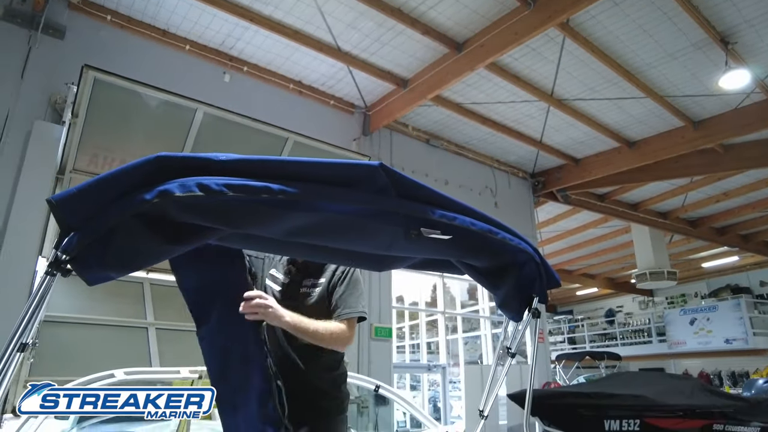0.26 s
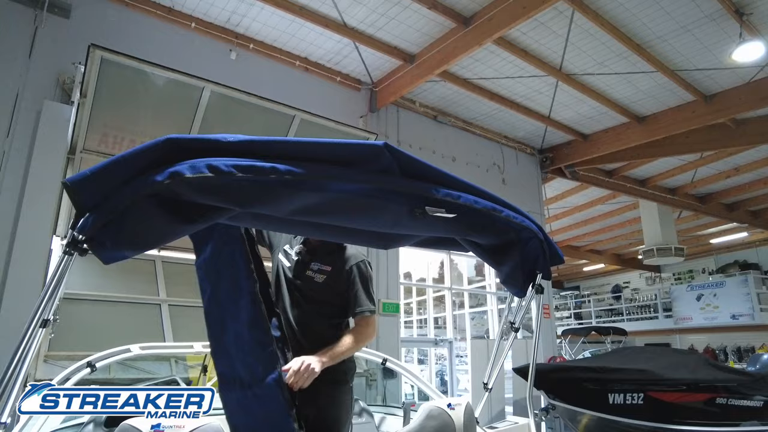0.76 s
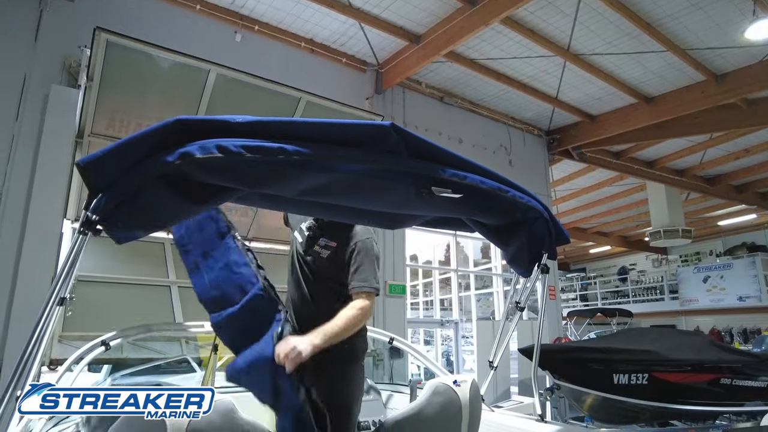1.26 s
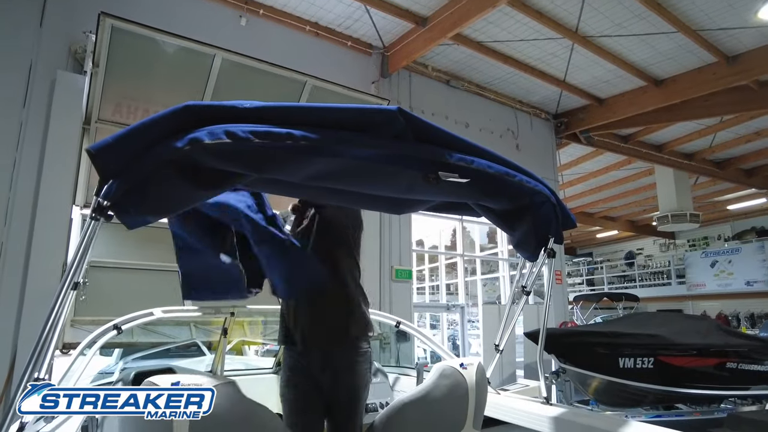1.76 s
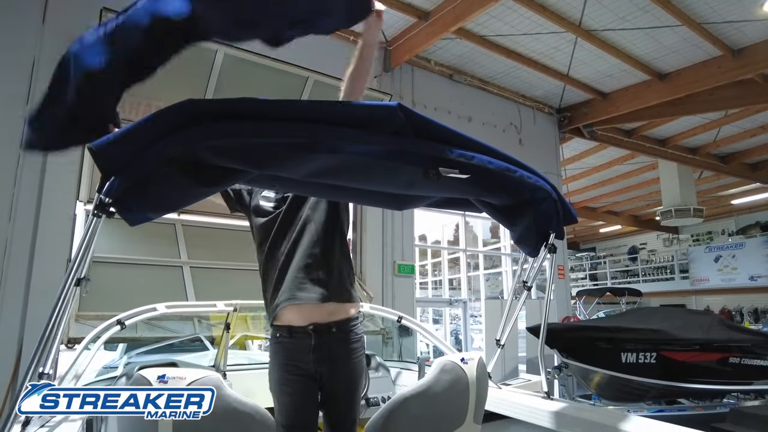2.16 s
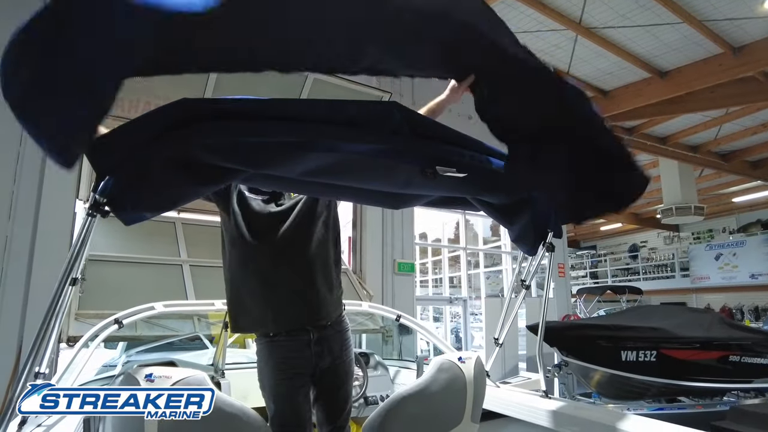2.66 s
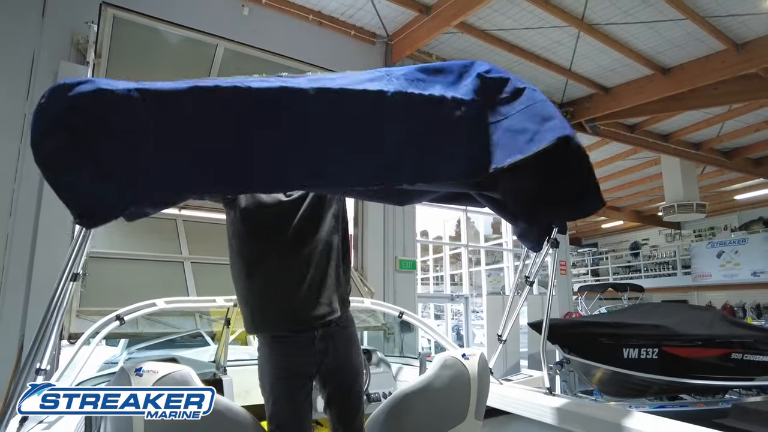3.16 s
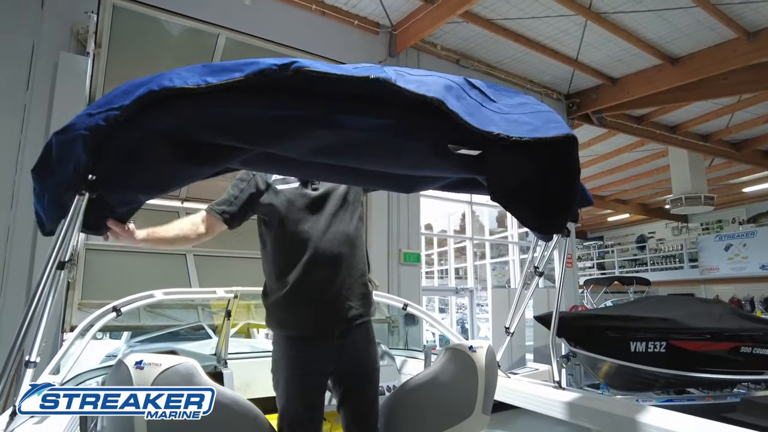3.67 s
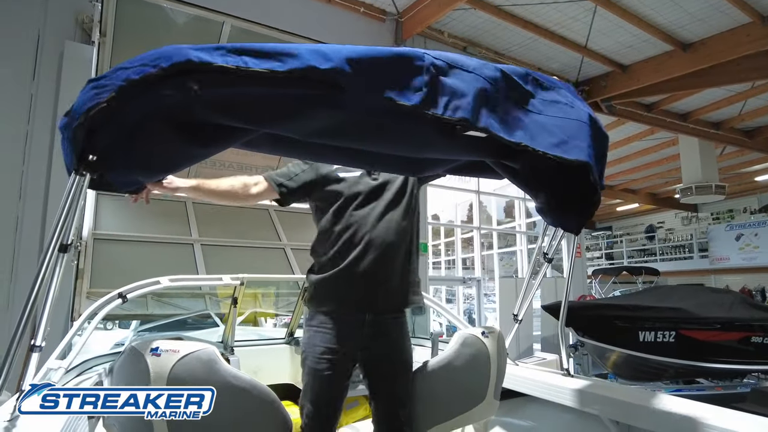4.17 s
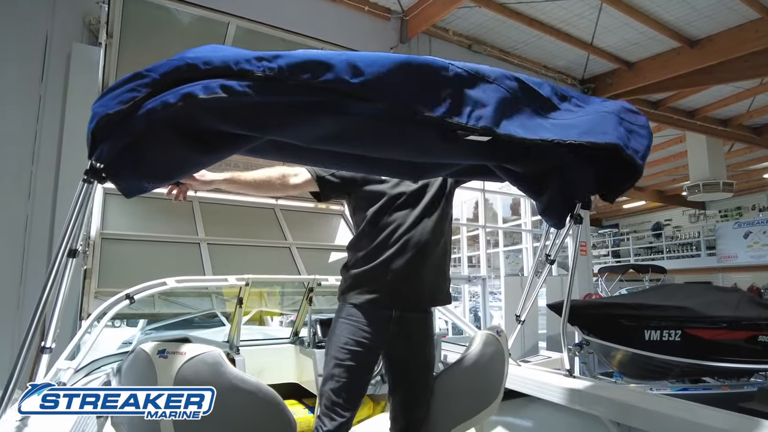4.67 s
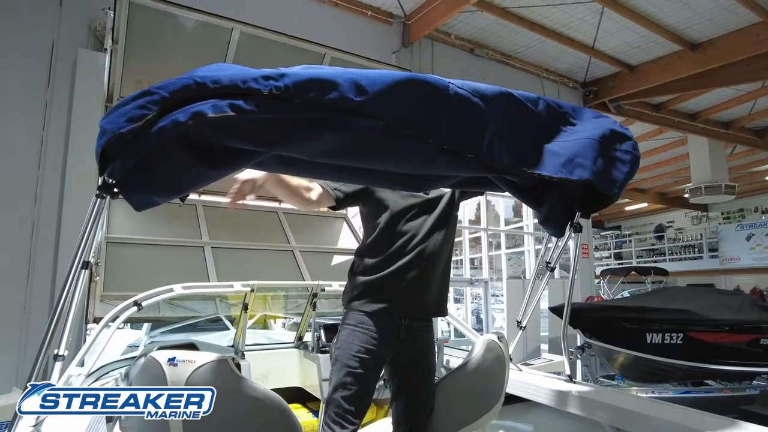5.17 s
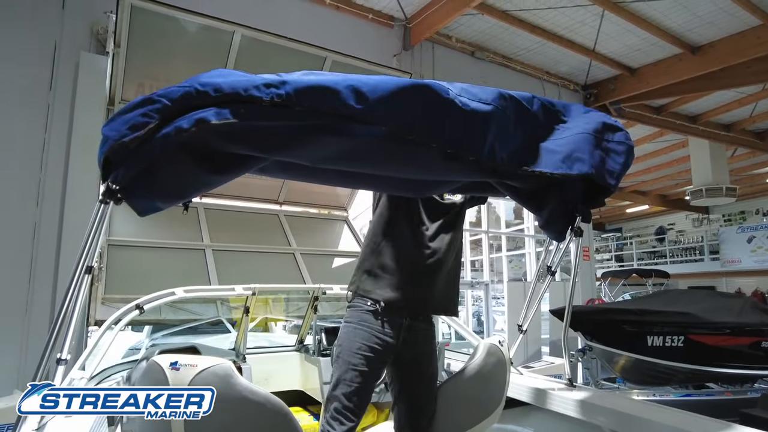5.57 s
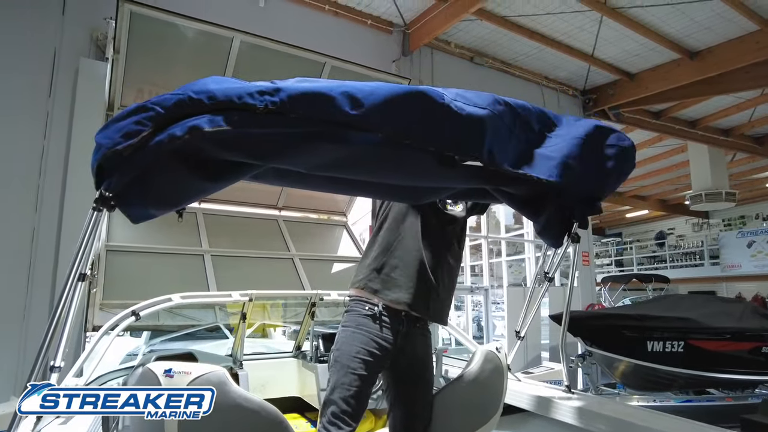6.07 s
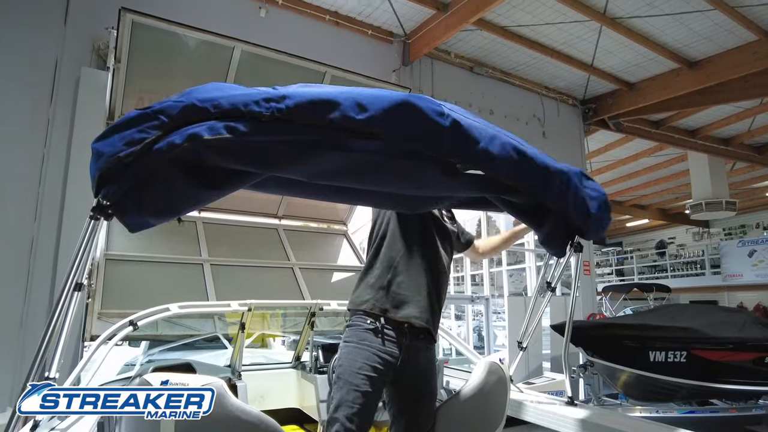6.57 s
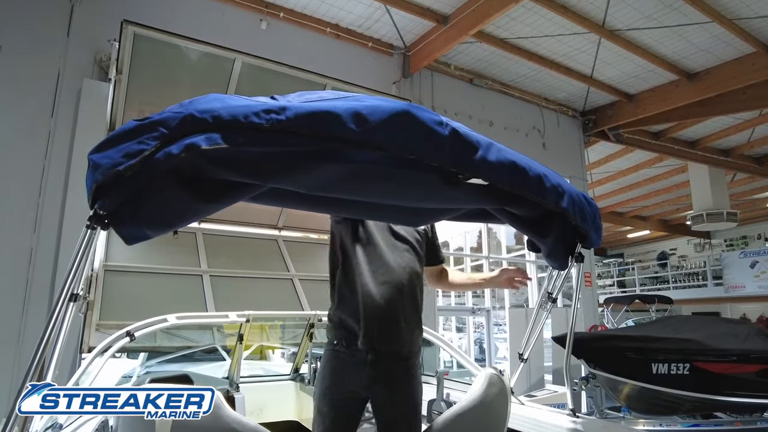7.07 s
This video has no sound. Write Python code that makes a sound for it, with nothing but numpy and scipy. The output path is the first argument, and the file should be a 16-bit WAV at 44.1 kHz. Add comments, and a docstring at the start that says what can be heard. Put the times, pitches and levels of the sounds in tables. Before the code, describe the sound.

Close, thick cloth crumples, flaps and rasps in bursts, with small metal clicks and a few tiny squeaks near the end, inside a big hall.

```python
"""A heavy canvas cover is lifted, thrown over a folded boat top and tugged into place, close to the microphone.
Place: a large showroom, with a steady background and a faint diffuse tail behind the close sounds.
Shaped bursts of tiny random slips make the weave hiss, the seams rasp, the sheet crumple and taut panels sound.
Folds snap in two decaying modes, hem catches are bright noise bursts, and a metal fitting cracks and rings.
The sheet pushes low, filtered puffs of air; near the end the hem gives short gliding squeaks."""
import sys
import numpy as np
from scipy import signal
from scipy.fft import rfft, irfft, next_fast_len
from scipy.io import wavfile
from scipy.ndimage import map_coordinates

SR = 44100
rng = np.random.default_rng(int(sys.argv[2]) if len(sys.argv) > 2 else 0)


def log_audio(samples):
    """Write samples as a 16-bit WAV file to the path given in sys.argv[1]."""
    # one column per channel
    frames = np.atleast_2d(samples).T
    # limit to full scale, then quantise
    limited = np.clip(frames, -1, 1)
    pcm = np.round(limited * 32767).astype(np.int16)
    wavfile.write(sys.argv[1], SR, pcm)


N = 322371  # length [samples]


def from_db(db):
    """Decibels to amplitude gain."""
    return 10 ** (np.asarray(db) / 20)


def rms_one(x):
    """Scale to an rms of 1."""
    return x / np.sqrt(np.mean(x ** 2) + 1e-20)


def in_time(rows):
    """Interpolate each column of a curve, sample by sample."""
    times, *columns = np.transpose(rows)
    return [np.interp(np.arange(N) / SR, times, column) for column in columns]


def add(out, s, sound):
    """Mix a short sound in at time s."""
    at = int(np.clip(round(s * SR), 0, N - 1))
    out[at:at + len(sound)] += sound[:N - at]


def drift(rate):
    """Smooth random wandering with a spread of 1; a higher rate [Hz] wanders faster."""
    step = 40  # samples between the slow values
    pole = np.exp(-2 * np.pi * rate * step / SR)
    noise = rng.standard_normal(N // step + 2002)
    slow = signal.lfilter([1], [1, -2 * pole, pole * pole], noise)[2000:]  # drop the settling
    return np.interp(np.arange(N) / step, np.arange(len(slow)), rms_one(slow))


def colour(x, spectrum):
    """Minimum-phase filter with the given spectrum, falling away beyond both of its ends."""
    size = next_fast_len(N + SR // 2)
    size += size % 2
    hz, db = np.transpose(spectrum)
    octave = np.log2(np.maximum(np.arange(size // 2 + 1) * SR / size, 1))
    above = np.maximum(octave - np.log2(hz[-1]), 0)
    below = np.clip(np.log2(hz[0]) - octave, 0, 2)
    shape_db = np.interp(octave, np.log2(hz), db) - 18 * (above + below)  # 18 dB per octave
    # folding the cepstrum onto positive time makes the filter causal
    cepstrum = irfft(np.log(from_db(shape_db)))[:size // 2]
    cepstrum[1:] *= 2
    response = np.exp(rfft(cepstrum, size))
    return irfft(rfft(x, size) * response)[:N]


def resonate(x, hz, width_hz):
    """A two-pole resonance with gain 1 on top."""
    r = np.exp(-np.pi * width_hz / SR)
    top = np.array([1, 0, -1]) * (1 - r * r) / 2
    return signal.lfilter(top, [1, -2 * r * np.cos(2 * np.pi * hz / SR), r * r], x + 1e-18)


def grains(per_s, spread_db):
    """Random tiny slips of uneven size and either sign; rms 1 at any rate."""
    sizes = from_db(spread_db * np.minimum(rng.exponential(1, N), 4)) * rng.choice([-1, 1], N)
    happens = rng.random(N) < per_s / SR
    return rms_one(sizes * happens / np.sqrt(per_s))


def rub(level_db, spectrum, per_s, spread_db, judder_db):
    """Threads catch and slip; a harder pull makes more slips, and the grip judders."""
    pull = from_db((level_db - np.max(level_db)) / 2)
    slips = grains(per_s * pull, spread_db) * from_db(judder_db * drift(25.0))
    return from_db(level_db) * rms_one(colour(slips, spectrum))


SWELL_DB, SWELL_CURVE = 12, 1.61  # drop one rise before and one fall after the peak; 2 = bell shape


def swell(s, rise_s, fall_s):
    """Gain of one movement: it gathers speed up to time s, then slows."""
    t = np.arange(N) / SR - s
    away = np.maximum(-t / max(rise_s, .001), t / max(fall_s, .001))
    gain, near = np.zeros(N), away < 10
    gain[near] = from_db(-SWELL_DB * away[near] ** SWELL_CURVE)
    return gain


# The held cover keeps stirring, except in flight before it lands; levels before pauses and layer gains:
# (time [s], hiss [dB], crumple [dB])
STIRRING = [(0, -60.5, -60.5), (0.4, -66, -62.5), (0.65, -74, -69), (0.95, -72.5, -66), (1.3, -65.5, -58.5),
            (1.75, -70.5, -59.5), (2.05, -74, -62.5), (2.4, -79, -76.5), (2.69, -98, -73.5),
            (2.82, -68, -52.5), (3.3, -72.5, -58.5), (3.8, -73.5, -60.5), (4.75, -70, -60.5),
            (5.5, -73.5, -66), (5.75, -69.5, -63.5), (6.15, -68, -61), (7.3, -67.5, -69.5)]
STIR_RASP_DB = -0.5  # rasp against hiss
# The stirring pauses while the hands change grip: time [s]
GRIP_PAUSES = [0.795, 2.05, 4.77, 4.92, 5.345, 5.56, 6.145, 6.94, 7.24]
PAUSE_S, PAUSE_DEPTH_DB = 0.029, 7
# Short brushes of cloth on cloth, levels before layer gains: (fastest moment [s], rise [s], fall [s],
# hiss of the weave [dB], rasp of the seams [dB], crumple of the sheet [dB])
CLOTH_BRUSHES = [(0.116, 0.051, 0.087, -58.5, -54, -55.5), (0.279, 0.036, 0.046, -47, -51, -52),
                 (0.712, 0.013, 0.02, -65, -68.5, -67), (0.832, 0.017, .055, -67, -63, -69),
                 (1.11, 0.064, 0.072, -63, -66, -68), (1.24, 0.014, 0.017, -58, -54, -70),
                 (1.394, 0.018, 0.079, -55.5, -56, -61), (1.598, 0.018, 0.011, -50, -49.5, -46),
                 (1.697, 0.019, 0.038, -61, -68, -47), (1.839, 0.054, 0.059, -54.5, -59, -53),
                 (1.965, 0.012, 0.02, -64, -59.5, -57.5), (2.175, .065, 0.07, -62.5, -75, -65.5),
                 (2.756, 0.023, 0.075, -55, -50, -43.5), (3.012, 0.11, 0.19, -59.5, -62, -48),
                 (4.52, 0.031, 0.021, -72, -78, -53), (4.6, 0.081, 0.07, -67.5, -73, -54),
                 (4.861, 0.044, .025, -82, -66.5, -57), (5.091, 0.045, 0.077, -62.5, -75, -56),
                 (5.61, 0.0093, 0.056, -61.5, -62.5, -55), (5.71, 0.017, 0.056, -66.5, -67, -55),
                 (5.84, 0.061, 0.091, -63, -82, -54), (5.985, 0.026, 0.06, -57.5, -56.5, -48.5),
                 (7.021, 0.033, 0.022, -56.5, -60, -54.5), (7.159, 0.061, 0.09, -57, -62, -59)]
# Three long pulls over the frame, one curve each, levels before the gains below and layer gains:
# (time [s], hiss [dB], rasp [dB], crumple [dB])
LONG_PULLS = [
    [(3.29, -74, -80, -68), (3.342, -45.5, -54, -45.5), (3.398, -41, -45, -42), (3.434, -42.5, -50.5, -43),
     (3.518, -45, -49, -41.5), (3.594, -42, -43, -37), (3.682, -73, -72, -59), (3.7, -75, -69, -82)],
    [(3.79, -74, -68, -63), (3.844, -63.5, -61.5, -55.5), (3.92, -64, -65.5, -54.5),
     (4.1, -58, -63.5, -52.5), (4.282, -55.5, -58.5, -48), (4.316, -54.5, -60.5, -54.5),
     (4.334, -55, -56, -48.5), (4.39, -75, -81, -66)],
    [(6.17, -75, -91, -65), (6.204, -66.5, -69, -68), (6.29, -60, -60, -69), (6.318, -54, -58, -55),
     (6.552, -45, -51, -40.5), (6.608, -43, -45, -33), (6.862, -64.5, -68, -58.5), (6.92, -71, -75, -57.5)],
]
PULL_HISS_DB, PULL_RASP_DB, PULL_CRUMPLE_DB = 0, -1, -1.5
PULL_STOP_DB_PER_S = 204  # fading away outside a pull


def handling():
    """Levels of hiss, rasp and crumple in dB: stirring, brushes and pulls add in power."""
    t = np.arange(N) / SR
    hiss_db, crumple_db = in_time(STIRRING)
    pause_db = PAUSE_DEPTH_DB * sum(swell(s, PAUSE_S, PAUSE_S) for s in GRIP_PAUSES)
    stir_db = np.array([hiss_db, hiss_db + STIR_RASP_DB, crumple_db]) - pause_db
    power = from_db(stir_db) ** 2
    for s, rise_s, fall_s, *levels_db in CLOTH_BRUSHES:
        power += np.outer(from_db(levels_db) ** 2, swell(s, rise_s, fall_s) ** 2)
    pull_gains_db = np.array([PULL_HISS_DB, PULL_RASP_DB, PULL_CRUMPLE_DB])[:, None]
    for pull in LONG_PULLS:
        outside_s = np.abs(t - np.clip(t, pull[0][0], pull[-1][0]))
        levels_db = np.array(in_time(pull)) + pull_gains_db
        power += from_db(levels_db - PULL_STOP_DB_PER_S * outside_s) ** 2
    return 10 * np.log10(power)


def off_the_folds(x, delay_ms=0.346, sway=0.333, echo=0.26):
    """A nearby fold reflects the sound; as it moves, the delay and so the colour shift."""
    lag = delay_ms / 1000 * SR * np.exp(sway * drift(4))  # [samples]
    late = map_coordinates(x, [np.arange(N) - lag], order=3)
    return (x + echo * late) / np.sqrt(1 + echo ** 2)


# Hiss of the fine weave, relative spectrum: (frequency [Hz], level [dB per Hz])
WEAVE_SPECTRUM = [(2200, -17.5), (3700, -4), (4900, 0.5), (7000, 1.5), (8700, -2.5), (10500, -11),
                  (13000, -16.5), (16000, -20.5)]
# Rasp of the coarse seams, relative spectrum: (frequency [Hz], level [dB per Hz])
SEAM_SPECTRUM = [(1000, -3.5), (1700, -1), (2400, 0), (3200, -3.5), (4000, -6.5), (6500, -15.5)]


def swish(weave_db, seams_db):
    """The fine weave hisses and the coarse seams rasp, both as dense slips."""
    weave = rub(weave_db - .3, WEAVE_SPECTRUM, per_s=26000, spread_db=1.0, judder_db=1.0)
    seams = rub(seams_db + 0.099, SEAM_SPECTRUM, per_s=6000, spread_db=-0.5, judder_db=1.1)
    return off_the_folds(weave + seams)


def small_folds(per_s=300, spread_db=3.0, cycles=2.46, count=14):
    """Little folds flip at random, each dealt one of a set of pitches; low ones weigh more."""
    flips, dealt = grains(per_s, spread_db), rng.integers(0, count, N)
    folds = np.zeros(N)
    for k, hz in enumerate(np.geomspace(340, 1600, count)):
        ring = resonate(flips * (dealt == k), hz, hz / cycles)
        folds += resonate(ring, hz, 0.96 * hz) / hz ** 1.7
    return rms_one(folds)


# Low rustle of the heavy sheet, relative spectrum: (frequency [Hz], level [dB per Hz])
SHEET_SPECTRUM = [(90, -12.5), (170, -3.5), (280, -1), (430, -1), (580, 0), (780, -1), (1100, -3.5),
                  (1600, -10), (2300, -23.5), (4000, -45)]


def crumple(bend_db):
    """Cloth rubs on the heavy sheet while small folds give way."""
    sheet = rub(bend_db - 2.5, SHEET_SPECTRUM, per_s=5000, spread_db=2.0, judder_db=0.5)
    return sheet + from_db(bend_db - 4.5) * small_folds()


# Swings of the sheet that push air: (time [s], level [dB], rise and fall [s])
AIR_PUFFS = [(0.305, -45.5, 0.064), (1.585, -46, .02), (1.645, -39, 0.038), (1.73, -44, 0.051),
             (1.85, -42, 0.054), (1.958, -37.5, 0.019), (2.84, -43, 0.11), (3.1, -48.5, 0.17),
             (3.4, -45.5, 0.097), (3.72, -51.5, 0.2), (6.63, -43.5, 0.21)]
# Low rumble of moved air, relative spectrum: (frequency [Hz], level [dB per Hz])
AIR_SPECTRUM = [(15, 1.5), (35, -5), (60, -9.5), (110, -17.5), (200, -26), (400, -46)]
AIR_FOLLOWS_DB = -11.5  # air moved by any bending, against the crumple


def waft(bend_db):
    """The swinging sheet pushes slow puffs of air at the microphone: low noise under swells."""
    puffs = sum(from_db(db) * swell(s, length_s, length_s) for s, db, length_s in AIR_PUFFS)
    air = rms_one(colour(rng.standard_normal(N), AIR_SPECTRUM))
    return np.hypot(puffs, from_db(bend_db + AIR_FOLLOWS_DB)) * air


# Steady background of the large room, relative spectrum: (frequency [Hz], level [dB per Hz])
SHOWROOM_SPECTRUM = [(20, 3), (50, -6.5), (100, -11), (160, -14), (250, -12.5), (330, -21), (480, -26.5),
                     (700, -24), (1000, -26), (1500, -28.5), (2000, -32), (3200, -50), (7000, -43),
                     (14000, -68)]
SHOWROOM_DB = -56.5  # rms


def showroom():
    """Steady, mostly low noise of the place, behind the close sounds."""
    return from_db(SHOWROOM_DB) * rms_one(colour(rng.standard_normal(N), SHOWROOM_SPECTRUM))


def hall(x, t60=1.2, gap_s=0.0018, wall_hz=7000):
    """The large room answers with a diffuse tail: decaying noise, its treble softened."""
    t = np.arange(SR * 3 // 2) / SR
    tail = rng.standard_normal(len(t)) * from_db(-60 * t / t60) * (t > gap_s)
    softness = signal.butter(1, min(wall_hz, .45 * SR), fs=SR, output="sos")
    tail = signal.sosfilt(softness, tail / np.sqrt(np.sum(tail ** 2)))
    return signal.fftconvolve(x, tail)[:N]


# Taut panels dragged over the frame, each with its own note:
# (start [s], end [s], rms level [dB], frequency [Hz])
PANEL_DRAGS = [(0.077, 0.143, -55.5, 3470), (0.257, 0.312, -57.5, 1240), (0.336, 0.517, -69, 2340),
               (1.054, 1.175, -63, 2090), (1.216, 1.246, -57, 2520), (2.736, 2.755, -40, 1490),
               (2.749, 2.835, -46.5, 960), (3.372, 3.482, -47.5, 950), (3.415, 3.604, -48, 542),
               (3.541, 3.631, -43.5, 1590), (4.196, 4.362, -50, 590), (4.197, 4.35, -58.5, 1720),
               (4.566, 4.652, -63.5, 1640), (6.33, 6.678, -55, 117), (6.56, 6.742, -44, 577)]
PANEL_WIDTH = 0.32  # width of each resonance, as a share of its note


def drags(fade_s=0.0064, judder_db=1.0):
    """Stretched cloth slips over a tube; the slips excite one resonance of the taut panel."""
    out = np.zeros(N)
    slips = grains(6000, spread_db=-1.0) * from_db(judder_db * drift(67))
    for start, end, level_db, hz in PANEL_DRAGS:
        t = np.arange(max(int((end - start) * SR), 200)) / SR
        width_hz = PANEL_WIDTH * hz
        panel = resonate(resonate(slips, hz, width_hz), hz, width_hz)[int(start * SR):][:len(t)]
        stroke = np.clip(np.minimum(t, t[-1] - t) / fade_s, 0, 1)
        add(out, start, from_db(level_db) * rms_one(panel * stroke))
    return out


# The metal fitting is jogged: (time [s], relative strength [dB])
FITTING_CLINKS = [(0.097, -36.5), (0.164, -43), (1.694, -51), (5.079, -51), (5.101, -51), (5.129, -45),
                  (5.16, -30.5), (5.167, -40), (5.254, -72), (5.366, -78), (5.453, -58)]
# Its modes, strengths before chance: (frequency [Hz], relative level [dB], 60 dB decay [s])
FITTING_MODES = [(3606, -12, .09), (6050, -8, .07), (6714, -7, .12), (8620, 0, .12), (8930, -8, .1),
                 (9220, -5, .11), (9900, -10, .09), (11420, -16, .2), (15620, -16, .12)]


def clinks(ring_db=-43, ring_growth=0.4, crack_db=-7, crack_t60=0.031, crack_hz=8900, crack_width_hz=3000):
    """Metal chatters on metal and modes of chance strength ring; the ring grows less than the crack."""
    out, t = np.zeros(N), np.arange(SR // 3) / SR
    hz, mode_db, t60 = np.transpose(FITTING_MODES)[:, :, None]
    contact = signal.butter(4, 10300, fs=SR, output="sos")  # low-pass [Hz]
    for s, strength_db in FITTING_CLINKS:
        each_db = mode_db + 3 * rng.standard_normal(hz.shape)
        modes = np.sin(2 * np.pi * (hz * t + rng.random(hz.shape)))
        ring = np.sum(modes * from_db(each_db - 60 * t / t60), axis=0)
        chatter = resonate(rng.standard_normal(len(t)), crack_hz, crack_width_hz)
        crack = rms_one(signal.sosfilt(contact, chatter)) * from_db(-60 * t / crack_t60)
        ring_gain = from_db(ring_db + ring_growth * strength_db)
        add(out, s, ring_gain * ring + from_db(crack_db + strength_db) * crack)
    return out


# Short catches of a stiff hem: (time [s], level before gain [dB], pitch [Hz])
HEM_CATCHES = [(0.162, -38.5, 4350), (1.387, -43, 6600), (1.595, -54, 2400), (1.631, -44, 1900),
               (1.817, -39.5, 2200), (2.024, -59, 5310), (2.736, -33.5, 2260), (2.864, -48, 4740),
               (3.063, -36, 2830), (5.609, -49.5, 7100), (7.084, -47.5, 5530), (7.127, -45, 4440),
               (7.156, -44, 2750)]
CATCH_T60_S = 0.029


def catches(width_hz=2600, broad_db=-6, gain_db=-6.5):
    """A hem hooks and lets go: a dying burst of bright noise, part pitched and part weave hiss."""
    out, t = np.zeros(N), np.arange(SR // 8) / SR
    slips = rng.standard_normal(N)
    broad = rms_one(colour(slips, WEAVE_SPECTRUM))
    for k, (s, level_db, hz) in enumerate(HEM_CATCHES):
        part = slice(k * len(t), (k + 1) * len(t))  # fresh noise for each catch
        pitched = rms_one(resonate(resonate(slips[part], hz, width_hz), hz, 3 * width_hz))
        burst = pitched + from_db(broad_db) * broad[part]
        add(out, s, burst * from_db(level_db + gain_db - 60 * t / CATCH_T60_S))
    return out


# Folds snapping through: (time [s], sounding 2 ms later, panel peak before gain [dB], pitch [Hz])
FOLD_SNAPS = [(0.333, -40.5, 487), (1.379, -41, 1110), (1.584, -40, 467), (1.63, -29.5, 505),
              (1.636, -30.5, 510), (1.641, -30.5, 610), (1.693, -39.5, 473), (1.815, -27.5, 605),
              (1.838, -33.5, 517), (1.932, -45, 477), (1.952, -44, 190), (2.19, -47.5, 740),
              (2.741, -33.5, 1150), (2.862, -37, 1110), (2.963, -40, 676), (3.168, -45, 544),
              (3.488, -31, 520), (4.575, -39, 670), (4.865, -44.5, 473), (5.462, -48.5, 770),
              (5.693, -46.5, 493), (5.813, -43.5, 467), (5.887, -43, 480), (6.618, -37, 614),
              (6.813, -39.5, 540), (7.125, -40, 555), (7.152, -38.5, 595), (7.285, -46, 1370)]
SNAP_CYCLES = 8.5  # cycles in which a fold dies by 60 dB


def snaps(upper_ratio=2.2, upper_db=-5, flutter_db=-21, flutter_t60=0.088, soft_hz=2200, gain_db=4.0):
    """A fold snaps: its panel swings in two modes and the sheet around it flutters."""
    delay_s = .002  # short delay before the snap sounds
    out, t = np.zeros(N), np.arange(SR // 10) / SR
    flutter = rms_one(colour(rng.standard_normal(N), SHEET_SPECTRUM))
    softness = signal.butter(2, soft_hz, fs=SR, output="sos")
    for k, (s, level_db, hz) in enumerate(FOLD_SNAPS):
        turn = 2 * np.pi * hz * t
        modes = np.sin(turn) - from_db(upper_db) * np.sin(upper_ratio * turn)
        panel = signal.sosfilt(softness, modes * from_db(-60 * hz * t / SNAP_CYCLES))
        around = flutter[k * len(t):][:len(t)] * from_db(flutter_db - 60 * t / flutter_t60)
        add(out, s + delay_s, from_db(level_db + gain_db) * (panel / np.abs(panel).max() + around))
    return out


# The hem squeaks on the tube, before jitter and flicker:
# (time [s], level [dB], slip rate at that time [Hz], glide [Hz per s])
HEM_SQUEAKS = [(7.135, -55, 4200, 16003), (7.158, -47.5, 2870, -22000), (7.182, -48, 2900, 22000)]
SQUEAK_RISE_S, SQUEAK_FALL_S = 0.0054, .011


def squeak(jitter=0.041, octave_db=-6, flicker_db=5.5):
    """Fast, unsteady stick-slip gives short gliding chirps with an octave above."""
    out, t = np.zeros(N), np.arange(N) / SR
    unsteady = 1 + jitter * drift(498)
    for s, db, hz, glide in HEM_SQUEAKS:
        slip_hz = np.clip(hz + glide * (t - s), hz / 2, 2 * hz) * unsteady
        turn = 2 * np.pi * np.cumsum(slip_hz) / SR
        chirp = np.sin(turn) + from_db(octave_db) * np.sin(2 * turn)
        out += chirp * from_db(db) * swell(s, SQUEAK_RISE_S, SQUEAK_FALL_S)
    return out * from_db(flicker_db * drift(300))


def scene():
    """Cloth and fitting close by, the hall and its steady background behind."""
    weave_db, seams_db, bend_db = handling()
    cloth = swish(weave_db, seams_db) + crumple(bend_db)
    close = cloth + drags() + clinks() + catches() + snaps() + squeak()
    return (close + from_db(-18.0) * hall(close) + waft(bend_db) + showroom())[None]


CUTOFF_HZ = 15900


def record(dry):
    """The treble above the cutoff is cut steeply by an elliptic low-pass."""
    return signal.sosfilt(signal.ellip(10, .1, 70, CUTOFF_HZ, fs=SR, output="sos"), dry)


dry = scene()
out = record(dry)
log_audio(out)
```